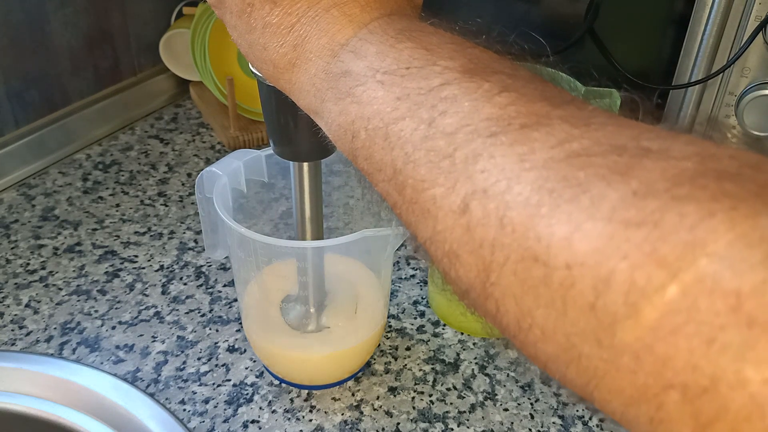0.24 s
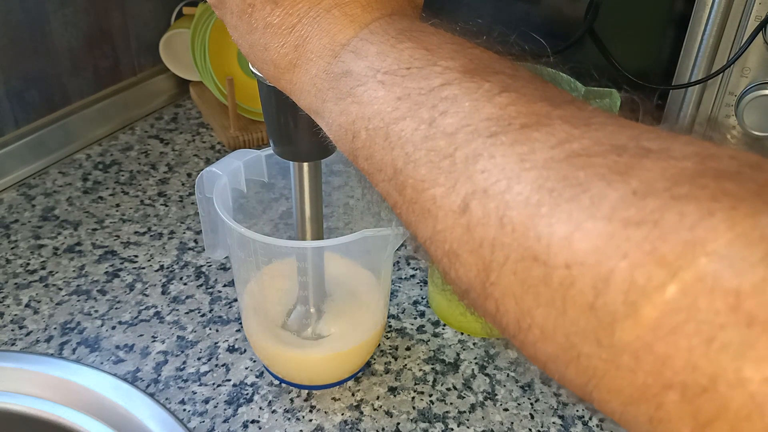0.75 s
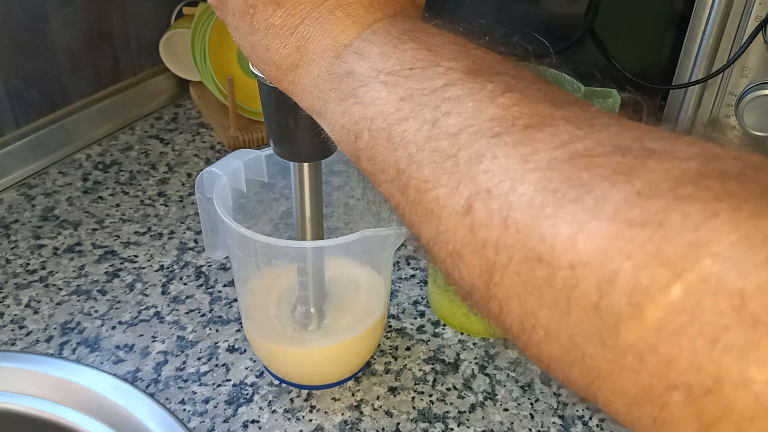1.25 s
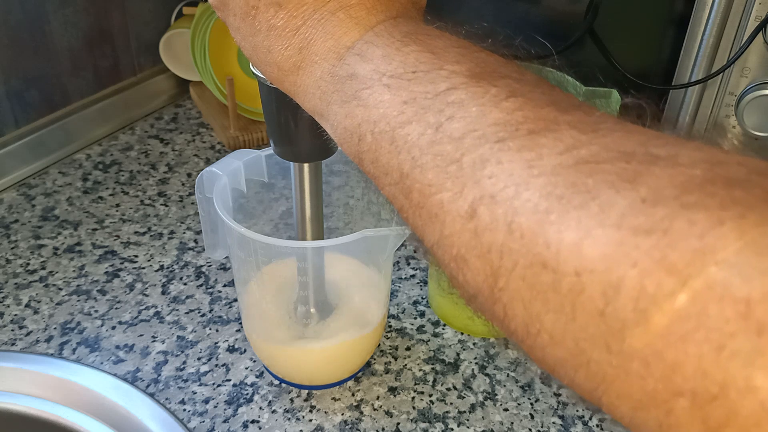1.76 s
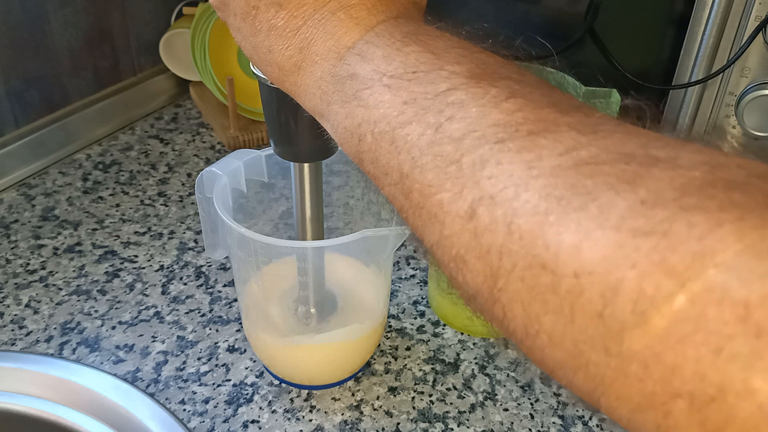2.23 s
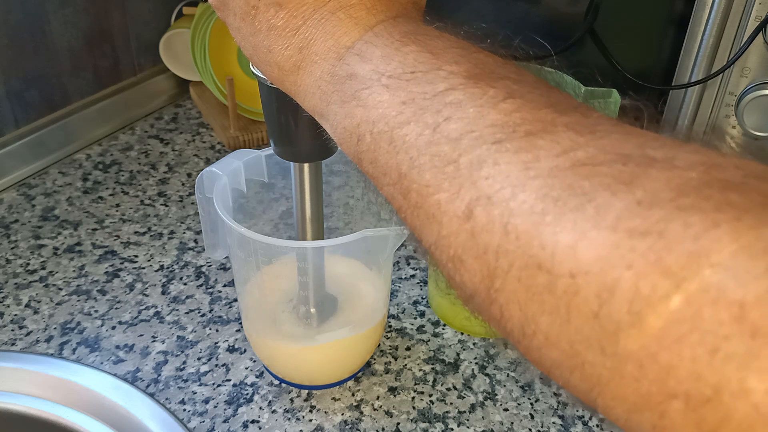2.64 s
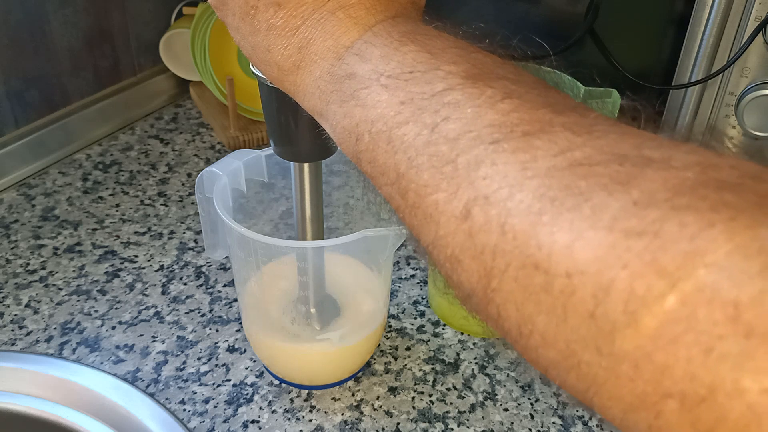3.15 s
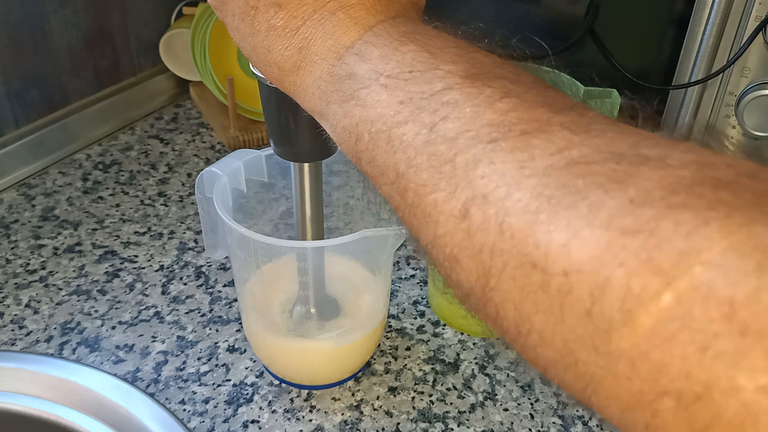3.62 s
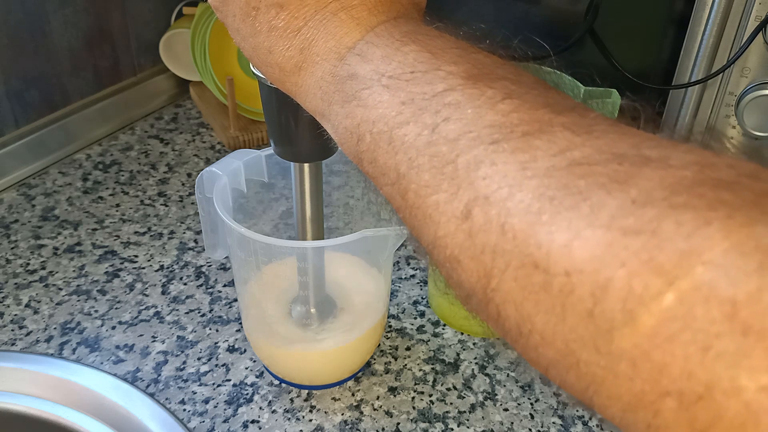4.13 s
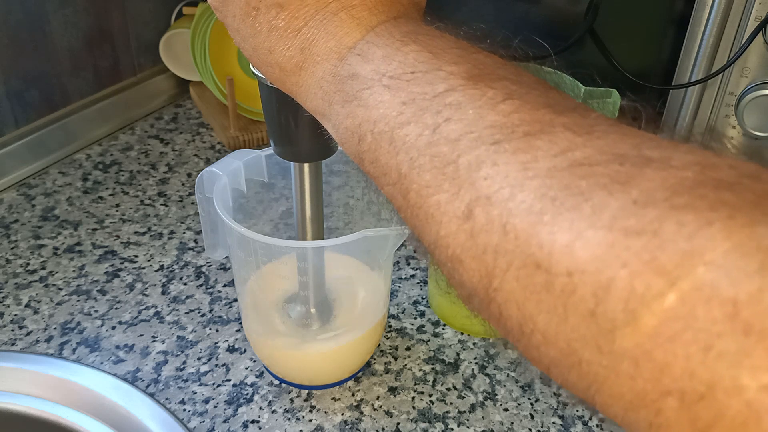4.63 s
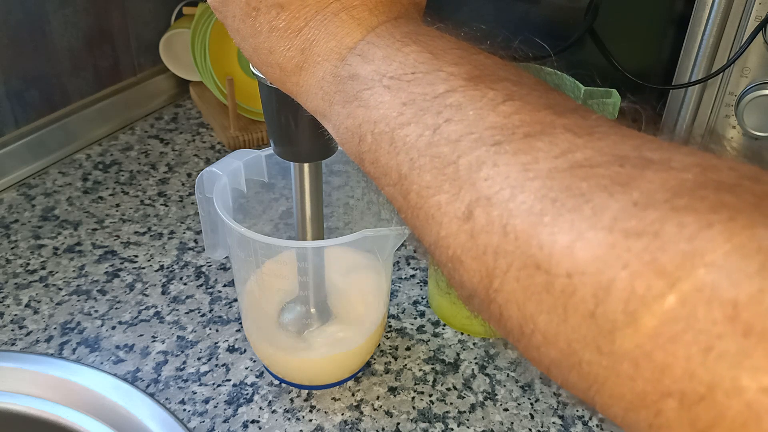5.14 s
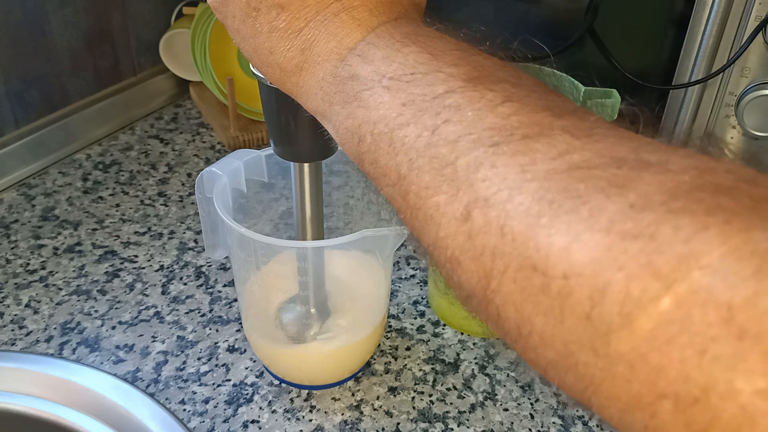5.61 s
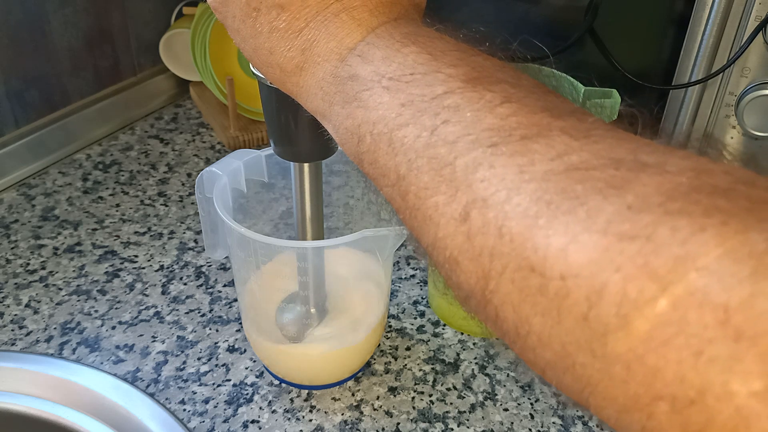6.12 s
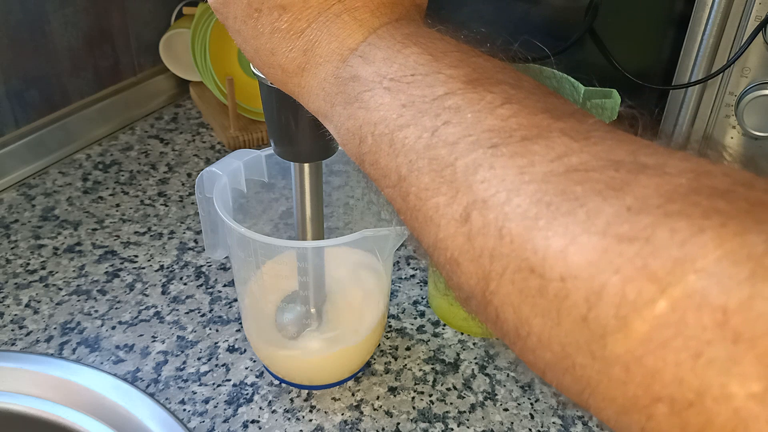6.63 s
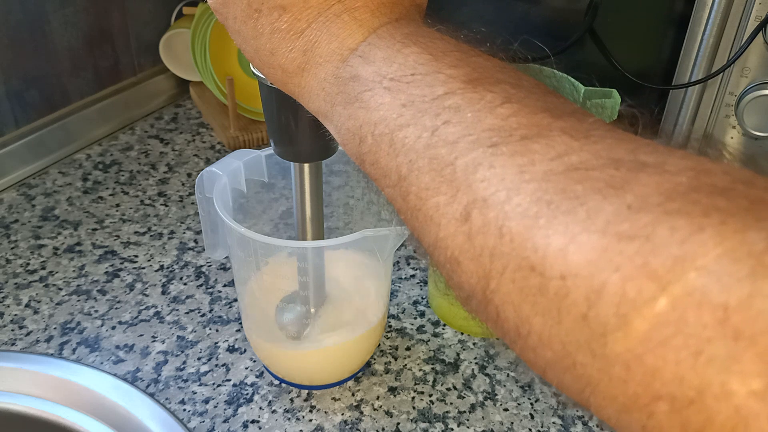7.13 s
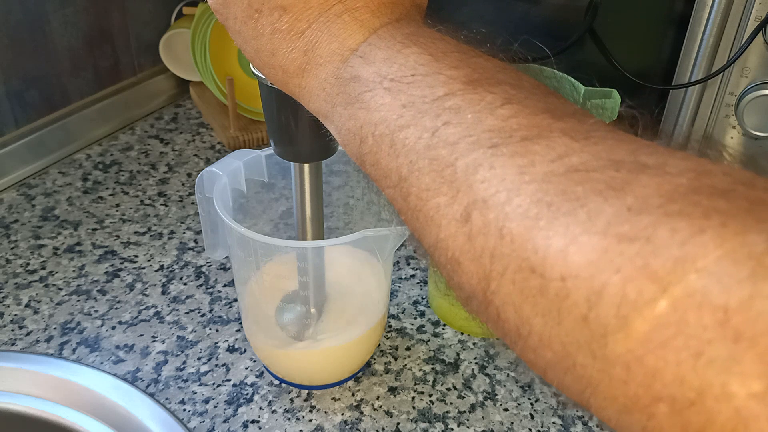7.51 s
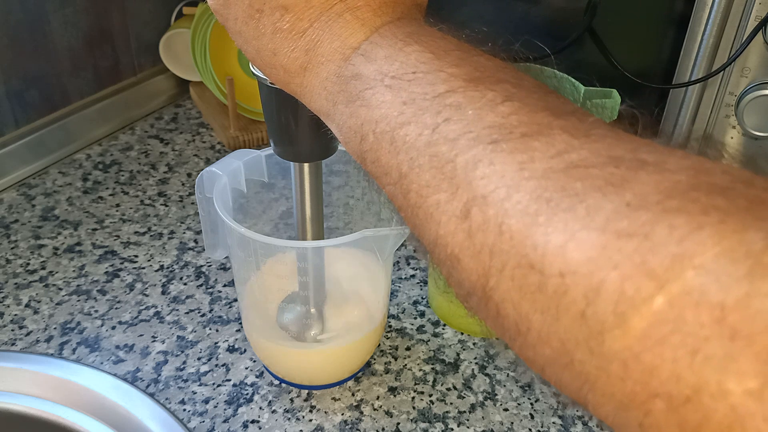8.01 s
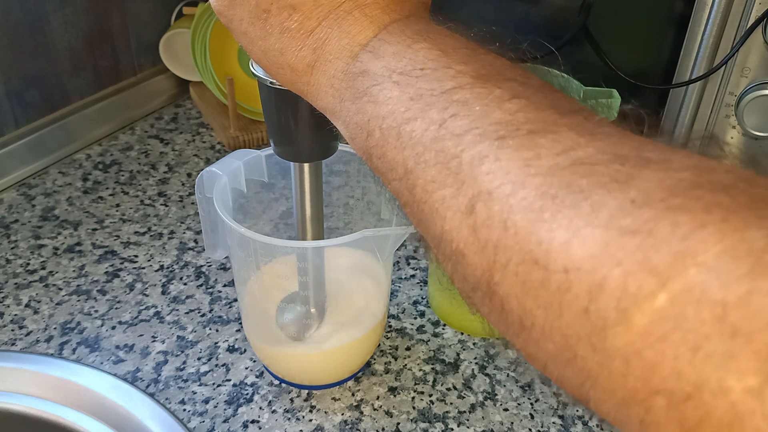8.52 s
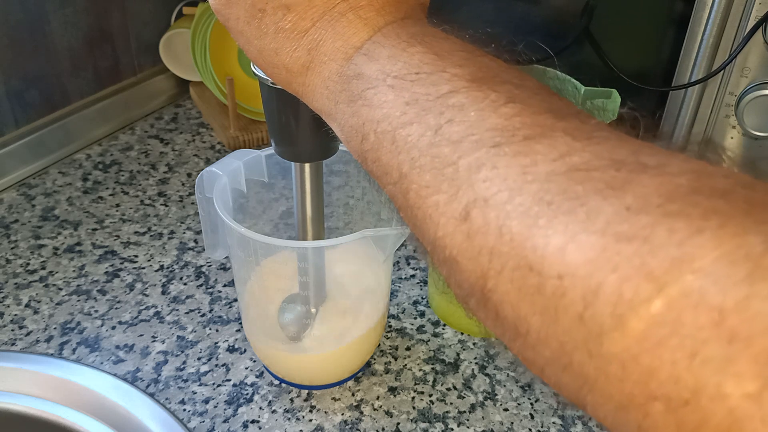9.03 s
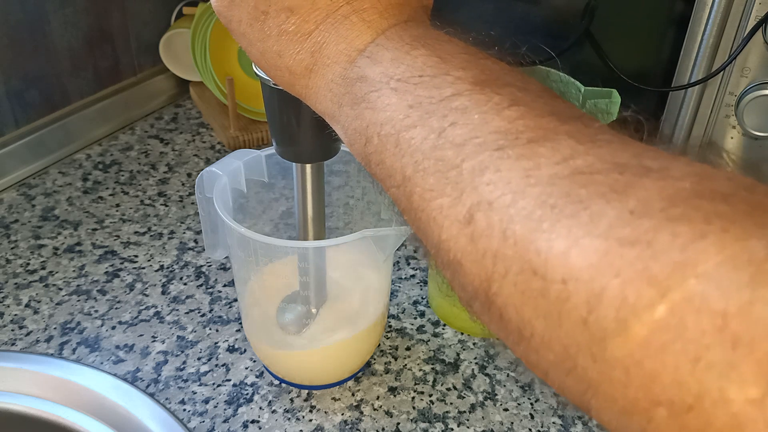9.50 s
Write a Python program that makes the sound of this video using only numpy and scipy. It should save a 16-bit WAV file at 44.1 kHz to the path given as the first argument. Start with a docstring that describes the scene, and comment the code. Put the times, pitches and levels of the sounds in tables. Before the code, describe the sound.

Close, constant hum and hiss of a hand blender whipping batter in a plastic beaker, in a tiled kitchen.

```python
"""On a kitchen counter, a stick blender whips batter in a plastic beaker, close to a two-port microphone.
The shaft hums on its harmonics and sags whenever the blade bites into thick batter. The churning sets
the beaker's air booming and the counter rumbling, while the motor's fan and brushes lay hiss on top.
The tiles answer with echoes, and a limiter ducks the loudest booms."""
import sys
import numpy as np
from scipy import signal
from scipy.fft import rfft, irfft, next_fast_len
from scipy.io import wavfile
from scipy.ndimage import uniform_filter1d, minimum_filter1d, map_coordinates

SR = 44100
rng = np.random.default_rng(int(sys.argv[2]) if len(sys.argv) > 2 else 0)


def persist_wave(psi):
    """Save psi, clipped to +-1, as 16-bit WAV."""
    counts = np.round(np.clip(psi, -1, 1) * 32767).astype(np.int16)
    wavfile.write(sys.argv[1], SR, np.atleast_2d(counts).T)


N = 430416
MAINS_THROB_HZ = 100  # the motor's pull throbs at twice the mains frequency

# The freely churning shaft. Each row: time in seconds, turns per second.
FREE_SPEED = [(0, 248.7), (.4, 249.8), (1.3, 247.4), (2.6, 246.7), (3.4, 245.9), (5.0, 245.0),
              (5.85, 246.6), (7.45, 245.5), (8.25, 246.3), (9.76, 245.7)]
# The blade bites into thick batter. Each row: middle in seconds, length in seconds, speed sag in Hz.
BITES = [(2.971, 0.451, 1.2), (4.47, 0.497, 0.701), (5.361, .65, 2.6), (6.721, .35, 0.51), (7.221, .45, .6),
         (7.869, 0.603, 1.895), (9.042, 0.39, 0.69), (9.459, .35, .6)]
# The hum between bites. Each row: time in seconds, then the levels of harmonics 1 to 4 in dB.
HUM_LEVELS = [(0, -34, -20.5, -21.5, -23), (.7, -35.5, -21.5, -17, -20.5), (1.5, -34, -21, -22.5, -22.5),
              (2.7, -34.5, -19.5, -16.5, -21.5), (4, -34, -19.5, -14.5, -21), (5, -36.5, -21, -14.5, -22),
              (5.9, -40, -22.5, -12.5, -24), (7, -42, -21, -13.5, -24), (7.6, -41, -21, -9.5, -28),
              (8.5, -43, -24, -15.5, -26.5), (9.76, -40.5, -23, -12.5, -26)]
# How hard the batter damps harmonics 1 to 4, in dB per Hz of sag.
DIP_DB_PER_HZ = [0.1, 2.4, 2.2, 3.8]
# How late harmonics 1 to 4 dip after the sag, in seconds; negative is early.
DIP_LAG_S = [0, .18, .05, -.12]
# Hand and arm shade the ports. Each row: time in seconds, then left over right in dB for harmonics 1 to 4.
HAND_SHADE = [(0, -8, -1, 1, -3), (1.7, -6, -3, .5, 6), (4.5, -3.5, -9.5, 0, -5), (9.76, -4, -13, -2, -9)]
# Grain of harmonics 1 to 4. Each row: left lead in radians, roughness from 0 to 1, mains sideband gain.
HUM_TEXTURE = [(.05, .16, .3), (1.17, .15, .06), (.77, .4, .03), (1.65, .1, .2)]
# The weaker whine above. Each row: harmonic number, upward shift in multiples of the mains throb,
# left level in dB, right level in dB, left lead in radians.
WHINE = [(5, 0, -34, -38, 2), (6, 0, -34, -39, 0.75), (7, 0, -39.5, -45, -0.4), (8, 0, -45.5, -47, 0.8),
         (5, 1, -41.5, -42.5, 1.1), (8, 1, -37, -38, 1), (10, 1, -39, -40, 0.7)]
# The churning mix. Each row: time in seconds, boom in dB, the deeper resonance's share from 0 to 1,
# motor hiss in dB, counter rumble in dB.
CHURN_MIX = [(0, -15, 0.12, -16.5, -44.5), (2.2, -12.5, 0.17, -18, -48.5), (4.5, -15, 0.48, -18, -53),
             (9.76, -15.5, .75, -19, -58)]
# Air over the batter, blade low and then blade high. Each row: pitch in Hz, width in Hz.
BEAKER_AIR = [(672, 84), (745, 89)]
# Colour of the motor's hiss. Each row: frequency in Hz, relative level in dB.
MOTOR_EQ = [(25, -55.5), (195, -9.5), (280, -13), (400, -2.5), (900, -1), (3000, -4), (3400, -13),
            (5200, -19.5), (5350, -25.5), (6300, -25.5), (6480, -16), (7300, -22), (7900, -33), (8300, -61)]
# Narrow ringing peaks in the motor's hiss: housing resonances and mains sidebands of the whine.
# Each row: pitch in Hz, width in Hz, lift over the hiss in dB.
MOTOR_PEAKS = [(1986, 30, 10), (1945, 50, 5), (2356, 25, 4), (2064, 40, 4), (866, 25, 5), (955, 40, 5),
               (1015, 40, 6), (510, 50, 5), (3260, 70, 6), (2841, 18, 4)]
# The tiled room's wetness. Each row: frequency in Hz, echo over direct sound in dB.
ECHO_BALANCE = [(30, 0.5), (130, -11), (750, -5.5), (1100, 11.5), (4000, 5), (6000, -13.5), (9000, -2)]
# Colour of the faint top hiss. Each row: frequency in Hz, relative level in dB.
TOP_HISS_EQ = [(7000, -40), (8300, -3), (10000, -10), (12400, -11), (13200, -8.5), (15500, -10.5)]


def amp(db):
    """dB to gain."""
    return 10 ** (np.asarray(db) / 20)


def unit(x):
    """Scaled to rms 1."""
    return x / np.sqrt(np.mean(x ** 2) + 1e-20)


def eq_db(points, hz):
    """An EQ curve in dB, drawn through points on a log frequency axis."""
    f, db = np.transpose(points)
    return np.interp(np.log(hz + 1), np.log(f + 1), db)


def envelopes(rows):
    """One envelope for each column after the time."""
    times, *columns = np.transpose(rows)
    return np.array([np.interp(np.arange(N) / SR, times, column) for column in columns])


def wobble(rate):
    """A smooth random curve, rate knots a second."""
    return map_coordinates(rng.standard_normal(int(N * rate / SR) + 4), [np.arange(N) * rate / SR])


def filtered(x, response):
    """x shaped by a complex frequency response."""
    size = next_fast_len(N + SR // 2)
    return irfft(rfft(x, size) * response(np.fft.rfftfreq(size, 1 / SR)), size)[..., :N]


def mode(f, hz, width):
    """A resonance of peak gain 1."""
    return 1j * f * width / (hz * hz - f * f + 1j * f * width)


def path_noises():
    """Three unrelated noises: the direct path, then the wash of echoes at each port."""
    return rng.standard_normal((3, N))


def bite_sag(lag_s=0):
    """How far thick batter drags the shaft down, in Hz; each bite swells and lets go smoothly."""
    t = np.arange(N) / SR - lag_s
    return sum(hz * np.cos(np.pi * np.clip((t - middle) / length, -.5, .5)) ** 2
               for middle, length, hz in BITES)


def shaft_angle():
    """The shaft's turning, in radians; the batter makes its speed waver."""
    speed_hz = envelopes(FREE_SPEED)[0] - bite_sag() + 0.289 * wobble(9)
    return 2 * np.pi * np.cumsum(speed_hz) / SR


def hum_gains(wander_db=0.86, blade_wobble_db=-33.5):
    """Gains of harmonics 1 to 4: bites damp the upper ones, and the loaded blade's wobble feeds the first."""
    gains = amp([db - dip * bite_sag(lag) + wander_db * wobble(4)
                 for db, dip, lag in zip(envelopes(HUM_LEVELS), DIP_DB_PER_HZ, DIP_LAG_S)])
    gains[0] = np.sqrt(gains[0] ** 2 + amp(2 * blade_wobble_db) * bite_sag())
    return gains


def rough_tone(angle, roughness, left_lead, rate=22):
    """A complex stereo tone of power 1, roughened by a shake in level and phase."""
    shake = (unit(wobble(rate)) + 1j * unit(wobble(rate))) / np.sqrt(2)
    grain = np.sqrt(1 - roughness ** 2) + roughness * shake
    return grain * np.exp(1j * (angle + np.array([[left_lead], [0]])))


def shaft_hum(angle):
    """The shaft sings on its harmonics at each port; the mains throb adds sidebands above them."""
    throb = np.exp(2j * np.pi * MAINS_THROB_HZ * np.arange(N) / SR)
    hum = np.zeros((2, N))
    harmonics = zip(hum_gains(), envelopes(HAND_SHADE), HUM_TEXTURE)
    for k, (gain, pan_db, (lead, roughness, sideband)) in enumerate(harmonics, 1):
        stagger = np.pi / 2 * k ** 2  # the harmonics do not peak together
        tone = rough_tone(k * angle + stagger, roughness, lead) * (1 + sideband * throb)
        pan = np.sqrt(2 / (1 + amp([-2 * pan_db, 2 * pan_db])))  # mean power 1
        hum += gain * pan * np.sqrt(2) * tone.real
    for k, shift, left_db, right_db, lead in WHINE:
        tone = rough_tone(k * angle, .5, lead) * throb ** shift
        hum += amp([[left_db], [right_db]] + 1.3 * wobble(2)) * np.sqrt(2) * tone.real
    return hum


def beaker_boom():
    """Sloshing batter excites the air column; the boom deepens as the blade is worked lower."""
    def air_band(hz, width):
        """The heaving surface spreads the resonance into a flat top."""
        return lambda f: mode(f, hz - width / 3, width) ** 2 * mode(f, hz + width / 3, width) ** 2

    boom_db, deep_share = envelopes(CHURN_MIX)[:2]
    deep, high = [unit(filtered(path_noises(), air_band(hz, width))) for hz, width in BEAKER_AIR]
    blend = np.sqrt(deep_share) * deep + np.sqrt(1 - deep_share) * high
    return amp(boom_db + 0.85 * wobble(3)) * blend


def motor_hiss(angle, splash_db=0.64):
    """Fan, brush and splash noise pulses with the shaft and the mains, coloured by ringing peaks."""
    def colour(f):
        """Narrow peaks rise out of the hiss."""
        peaks = sum((amp(2 * db) - 1) * np.abs(mode(f, hz, width)) ** 2 for hz, width, db in MOTOR_PEAKS)
        return amp(eq_db(MOTOR_EQ, f)) * np.sqrt(1 + peaks)

    pulse = 1 + .08 * np.sin(angle) + .05 * np.sin(2 * np.pi * MAINS_THROB_HZ * np.arange(N) / SR)
    spectra = signal.stft(pulse * path_noises(), nperseg=512)[2]
    speckle = rng.standard_normal(spectra.shape[1:])
    splashes = uniform_filter1d(uniform_filter1d(speckle, 14, 0), 7, 1)  # patches in pitch and time
    noise = signal.istft(spectra * amp(splash_db * unit(splashes)), nperseg=512)[1][:, :N]
    level_db = envelopes(CHURN_MIX)[2] + .2 * wobble(2.5) + .35 * wobble(20)
    return amp(level_db) * unit(filtered(noise, colour))


def counter_rumble():
    """The beaker shakes the counter top into a low, lumpy rumble."""
    level_db = envelopes(CHURN_MIX)[3] + 3.8 * wobble(11)
    return amp(level_db) * unit(filtered(path_noises(), lambda f: mode(f, hz=135, width=59) ** 2))


def tiled_kitchen(paths, left_lead_s=7 / SR, ripple_db=1.55, spacing_hz=22):
    """Direct sound reaches the nearer, left port first; the tiles add a wide wash and standing waves."""
    wet = lambda f: 1 / (1 + amp(-2 * eq_db(ECHO_BALANCE, f)))
    # The direct sound's top treble is in phase on left and right, so it sounds centred.
    phase = lambda f: np.pi * np.minimum(f * left_lead_s, 1) * np.array([[1], [-1]])
    direct = filtered(paths[0], lambda f: np.sqrt(1 - wet(f)) * np.exp(1j * phase(f)))
    echoes = filtered(paths[1:], lambda f: np.sqrt(wet(f)))
    ripple = rng.standard_normal(SR // 20)
    standing_waves = lambda f: amp(ripple_db * wet(f) * map_coordinates(ripple, [f / spacing_hz]))
    return filtered(direct + echoes, standing_waves)


def top_hiss():
    """A faint, steady sheen above the motor's noise, nearly mono."""
    noise = rng.standard_normal(N) + .25 * rng.standard_normal((2, N))
    return amp(-56.5) * unit(filtered(noise, lambda f: amp(eq_db(TOP_HISS_EQ, f))))


def scene():
    """The mix: hum up close, boom, hiss and rumble through the room, a sheen on top."""
    angle = shaft_angle()
    hum = shaft_hum(angle)
    churn = beaker_boom() + motor_hiss(angle) + counter_rumble()
    lean_left = amp([[.6], [-.6]])
    return hum + lean_left * tiled_kitchen(churn) + top_hiss()


def record(dry):
    """A touch of gain, a stereo-linked limiter to duck the loudest booms, then a brick-wall high cut."""
    drive_db, ceiling, high_cut_hz = 1.07, .96, 15540
    driven = amp(drive_db) * dry
    safe_gain = np.minimum(1, ceiling / (np.abs(driven).max(axis=0) + 1e-9))
    held_gain = minimum_filter1d(safe_gain, size=1400, origin=480)  # short look-ahead, longer hold
    ducking = uniform_filter1d(held_gain, size=400)
    return filtered(driven * ducking, lambda hz: hz < high_cut_hz)


dry = scene()
out = record(dry)
persist_wave(out)
```